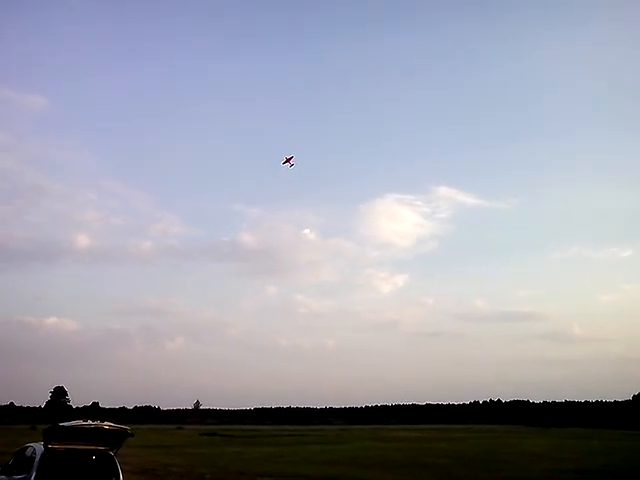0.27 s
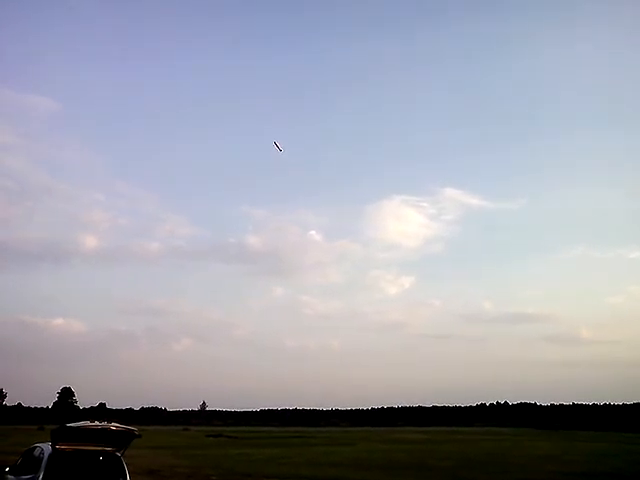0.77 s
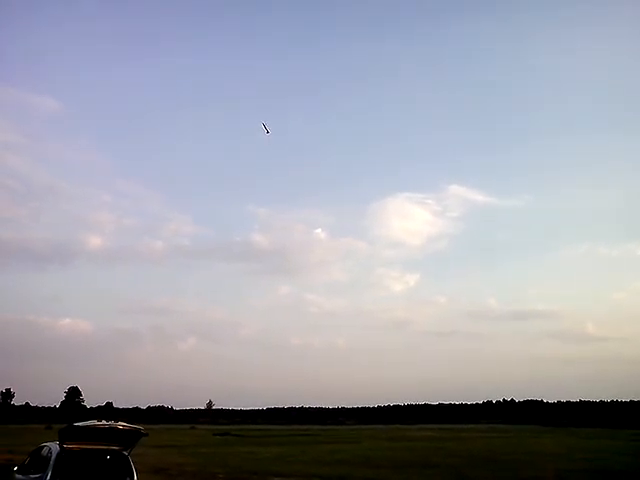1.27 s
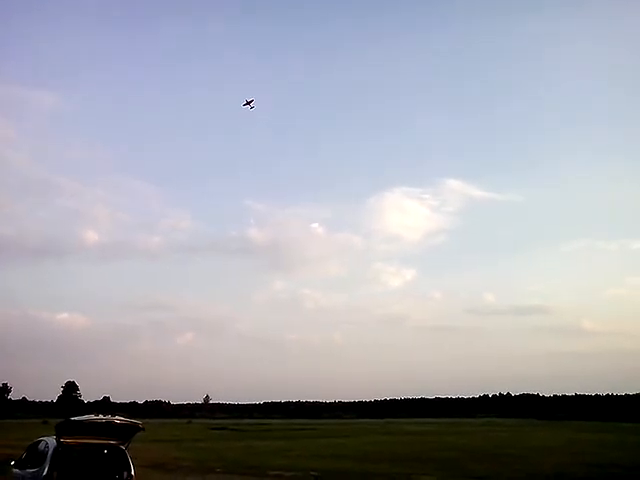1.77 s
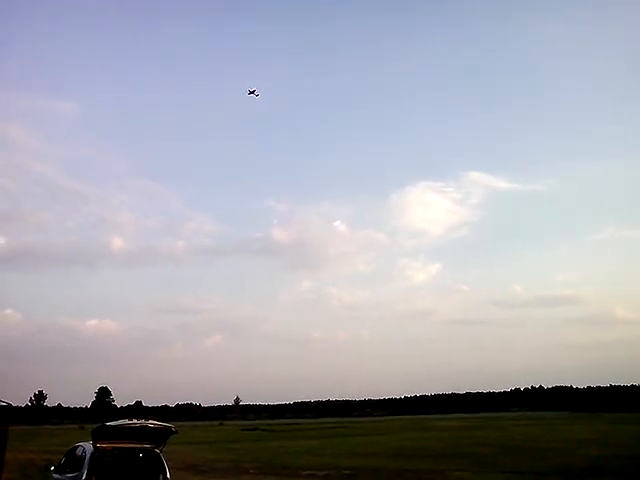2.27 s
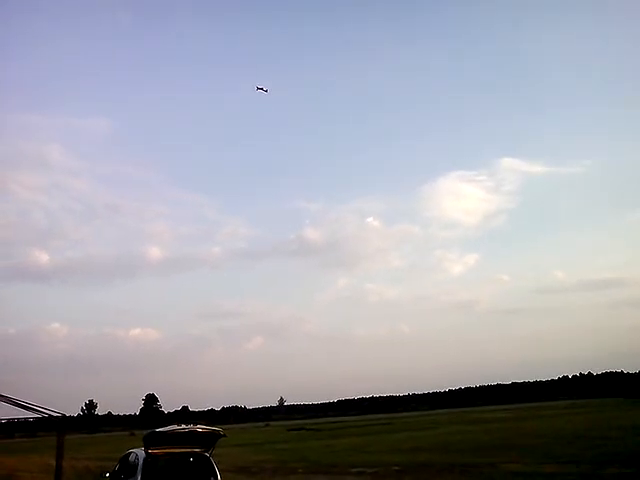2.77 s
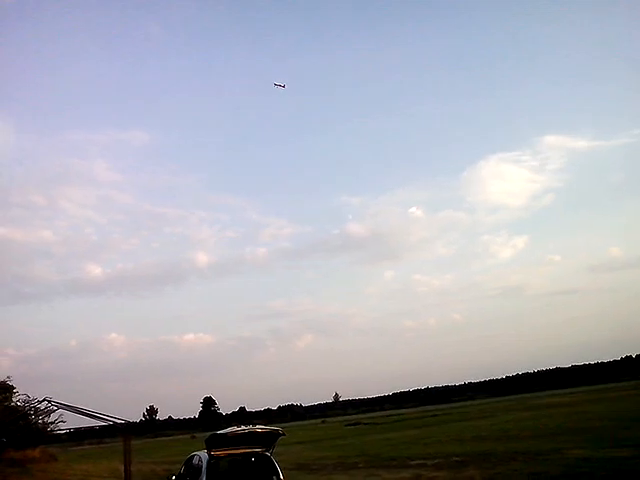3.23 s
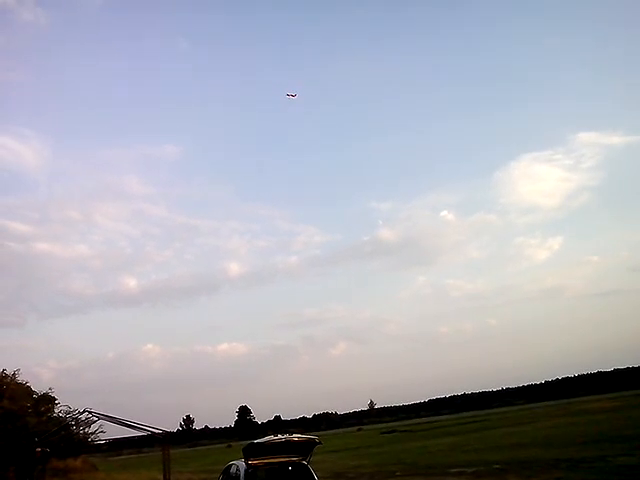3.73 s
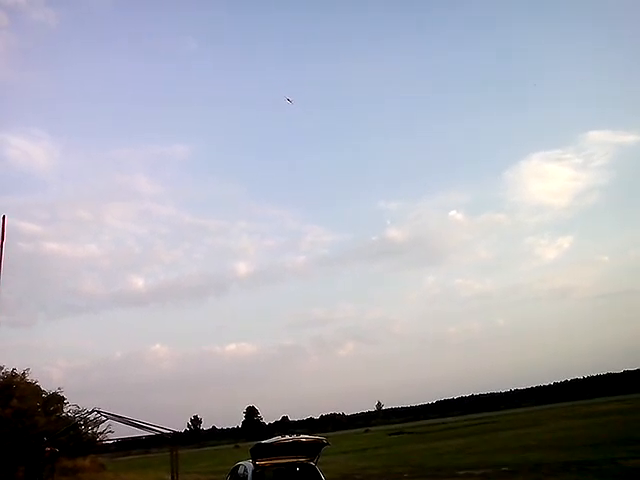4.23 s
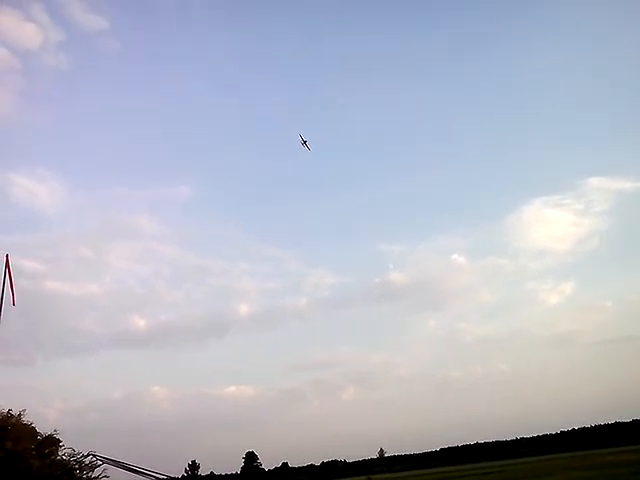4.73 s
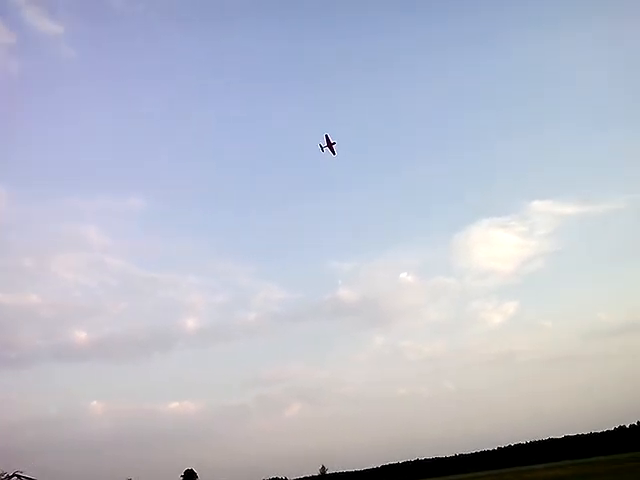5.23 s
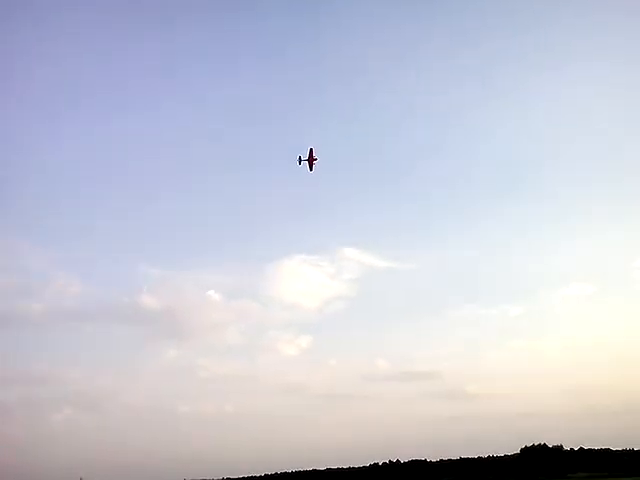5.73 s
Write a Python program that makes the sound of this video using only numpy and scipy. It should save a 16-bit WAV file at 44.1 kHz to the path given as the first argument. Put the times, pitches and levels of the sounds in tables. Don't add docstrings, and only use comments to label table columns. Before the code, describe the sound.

A small two-stroke petrol model aircraft flies over an open grass field, heard through a compact camera's narrow-band stereo microphone. From 0 s its raw, nasal buzz is already high, climbing to a peak near 0.5 s with gritty hiss and propeller swish. Around 0.7 s a short cluster of misfire pops breaks the tone; pitch sags and the sound recedes until 1.3 s, then swells again to about 1.75 s. From 1.8 s the throttle closes: the pitch falls fast through popping into a soft, low sputter. A brief blip rises at 2.6-2.9 s, then the engine sinks to its slowest, faintest putter around 3.6-3.9 s, with quiet air and a distant machine hum beneath. Uneven pops announce the throttle opening at 3.9-4.25 s; pitch races up by 4.7 s, and the hard, bright snarl keeps growing through the swoop, loudest towards 6 s, with slight reflections from ground and trees.

```python
import sys
import numpy as np
from scipy import signal
from scipy.fft import rfft, irfft, next_fast_len
from scipy.io import wavfile
from scipy.ndimage import uniform_filter1d, map_coordinates

SR = 44100
rng = np.random.default_rng(int(sys.argv[2]) if len(sys.argv) > 2 else 0)


def level_to_linear(level):
    exponent = np.asarray(level, float) / 20
    return 10 ** exponent


def output_pcm(signal):
    pcm = np.clip(np.atleast_2d(signal).T, -1, 1) * 32767
    wavfile.write(sys.argv[1], SR, np.round(pcm).astype(np.int16))


N = 264600

# time in seconds, exhaust level in dB,
# treble of the outlet in view in dB.
ENGINE = [(0, -34, -9.5), (.35, -35, -8.5), (.5, -29, -9.5), (.95, -32.5, -7), (1.3, -39, -11),
          (1.42, -35.5, -10.5), (1.8, -30.5, -8.5), (2, -33.5, -9.5), (2.3, -49, -20.5), (2.6, -44.5, -8),
          (2.8, -35.5, -9), (3.2, -45.5, -15.5), (3.65, -50.5, -27.5), (4.08, -39, -4.5),
          (4.25, -39, -14.5), (4.7, -29, -7), (5.1, -26.5, -5), (6, -24, -4.5)]


def shaft():
    # time in seconds, speed in turns per second.
    open_throttle = [
        (0, 102.5),
        (.3, 111.5),
        (.52, 113),
        (.8, 93),
        (1.22, 90.5),
        (1.45, 106),
        (1.65, 110),
        (4.82, 104),
        (5.35, 108),
        (6, 105),
    ]
    # time in seconds, speed in turns per second.
    coasting = [(1.82, 97.5), (2, 75), (2.18, 57.5), (2.31, 48.5), (2.5, 41), (2.6, 42), (2.73, 52),
                (2.83, 66), (2.88, 73.5), (3, 64), (3.2, 50), (3.4, 43), (3.54, 39.3), (3.86, 35.5),
                (3.99, 37), (4.17, 51.5), (4.44, 81.5), (4.6, 96)]
    inertia_s = .09
    speed = uniform_filter1d(curves(sorted(open_throttle + coasting))[0], size=int(inertia_s * SR))
    turns = np.cumsum(speed) / SR
    at = np.round(all_pops()[0] * SR).astype(int)
    slip = np.interp(np.arange(N), at, np.unwrap(turns[at] % 1, period=1))
    return speed, turns - uniform_filter1d(slip, size=3000)


def firing(speed):
    # speed in turns per second, crack level against the wash in dB, unevenness in dB.
    regularity = [
        (45, -3.5, 1.5),
        (70, -2.5, 1.2),
        (92, -1.4, .8),
        (107, -1.2, .8),
    ]
    # start in seconds, end in seconds.
    misfires = [
        (.65, .76),
        (1.81, 2.06),
        (2.52, 2.72),
        (3.83, 4.16),
    ]
    # time in seconds, extra unevenness in dB re 1 dB, width in seconds.
    shakes = [
        (.15, 3, .13),
        (.38, 0, .08),
        (1.42, 2, .1),
        (2.2, 0, .1),
        (3.3, 2, .06),
    ]
    choke_s, missed_crack_db, missed_uneven_db = .04, -12, 2.6
    t = np.arange(N) / SR
    rate, crack_db, uneven_db = np.transpose(regularity)
    missed = uniform_filter1d(sum(1. * (t > a) * (t < b) for a, b in misfires), size=int(choke_s * SR))
    crack_db = np.interp(speed, rate, crack_db) * (1 - missed) + missed_crack_db * missed
    uneven_db = np.interp(speed, rate, uneven_db) * (1 - missed) + missed_uneven_db * missed
    return crack_db, uneven_db + swells(shakes), missed


def all_pops():
    # time in seconds, peak in dB, treble in dB.
    lone = [(0.675, -25, -39), (0.694, -20, -37), (0.714, -17.5, -33), (0.735, -19.5, -34),
            (0.756, -26, -34), (0.777, -27, -36), (1.804, -25, -42), (1.836, -20, -39), (1.869, -22, -49),
            (1.904, -20, -49), (1.952, -22, -54), (2.032, -32, -56), (2.548, -30, -46), (2.595, -29, -48),
            (2.641, -28, -45), (2.663, -30, -52), (2.684, -27, -47), (2.704, -27, -45), (2.724, -28, -46),
            (3.593, -32, -58), (3.87, -30, -54), (3.897, -31, -58), (3.951, -29, -51), (3.977, -36, -54),
            (4.03, -33, -52), (4.078, -29, -42), (4.1, -29, -49), (4.121, -27, -54), (4.141, -30, -49),
            (4.161, -31, -49), (4.249, -25, -49)]
    # time in seconds, peak in dB, treble in dB.
    putts = [(2.619, -33, -48), (2.743, -39, -46), (2.761, -31, -50), (2.778, -28, -49), (2.794, -27, -55),
             (2.911, -29, -54), (3.219, -43, -59), (3.24, -34, -62), (3.26, -47, -59), (3.282, -35, -59),
             (3.369, -33, -55), (3.412, -38, -47), (3.436, -40.5, -54), (3.541, -48, -62), (3.62, -42, -62),
             (3.673, -42, -61), (3.728, -40, -54), (3.811, -38, -54), (3.842, -37, -48), (4.004, -38, -50),
             (4.055, -32, -44.5), (4.18, -30, -54), (4.198, -29, -53), (4.282, -31.5, -56),
             (4.355, -30, -50)]
    rows = np.vstack([lone, np.add(putts, [0, -2.5, -7])])
    return rows[np.argsort(rows[:, 0])].T


def crack_train(speed, turns):
    crack_db, uneven_db, _ = firing(speed)
    at = np.interp(np.arange(np.ceil(turns[0]), int(turns[-1]) + 1), turns, np.arange(N))
    i = at.astype(int)
    chance = rng.standard_normal((len(at), 2))
    size = level_to_linear(crack_db[i] + uneven_db[i] * chance[:, 0]) * np.sqrt(SR / speed[i])
    return -spikes(at + .55 * uneven_db[i] * chance[:, 1], size)


def puff(pulses, decay_s=.0029):
    return signal.lfilter([1], [1, -np.exp(-1 / (decay_s * SR))], np.abs(pulses))


def silencer_bark(level, cracks, pops, wash):
    # frequency in Hz, level in dB.
    silencer = [(120, -43), (250, -3), (340, -19), (430, 4.5), (560, 4), (750, -2.5), (980, -5.5),
                (1300, 3), (1700, 3.5), (1900, -17.5), (2300, -39.5)]
    # frequency in Hz, level in dB.
    pipe_end = [(1300, -22.5), (1700, -8), (1900, 1), (2300, -8.5), (2700, -6.5), (3300, -46.5)]
    # time in seconds, rasp in dB.
    facing = [(0, -11), (.5, -13), (.8, -7), (1.2, -15.5), (1.7, -15.5), (2, -15.5), (2.8, -17), (3.5, -45),
              (4.1, -8), (4.4, -9), (5, -7.5), (5.5, -5.5), (6, -9.5)]
    bark = level * (cracks + .012 * puff(cracks) * noise_pair() + .55 * wash * noise_pair())
    bark += pops + .007 * puff(pops) * noise_pair()
    return coloured(bark, silencer) + coloured(level_to_linear(curves(facing)[0]) * bark, pipe_end)


def outlet_sizzle(outlet, cracks, spits):
    # frequency in Hz, level in dB.
    hiss = [(1800, -66.5), (2600, -12), (3100, -1), (3600, 1.5), (4000, -4), (4300, -6.5), (4750, -8.5),
            (5500, -4.5), (6300, -11), (7000, -14.5), (8000, -43)]
    spit_s, spit_gain = .0007, .035
    cowl_ms, cowl_gain = 1.4, .33
    jet = .006 * puff(cracks) + spit_gain * puff(cracks, spit_s)
    sizzle = outlet * (.6 * cracks + jet * noise_pair())
    sizzle += spits + .03 * puff(spits) * noise_pair()
    answer = echoed(sizzle, cowl_ms * (1 + .03 * wobble(1.517)), cowl_gain)
    return coloured((sizzle + answer) / np.hypot(1, cowl_gain), hiss)


def pipe_resonances(charges, pops):
    # frequency in Hz, level in dB.
    thump = [(120, -30), (230, -8), (380, 0), (620, -2), (1000, -25)]
    # frequency in Hz, level in dB.
    howl = [(720, -30), (900, -4), (1000, 0), (1110, -4), (1350, -30)]
    # time in seconds, level in dB, width in seconds.
    end_on = [
        (.55, -30, 0.17),
        (4.65, -17.5, .15),
        (5.3, -20.5, .45),
    ]
    # time in seconds, level in dB, width in seconds.
    from_behind = [
        (1.5, -14, 0.11),
        (1.9, -14, .15),
        (2.75, -10, 0.1),
        (2.91, -12, .04),
        (3.45, -5, .12),
        (4.05, -2, .13),
        (5.9, -10, .2),
    ]
    # time in seconds, level in dB, width in seconds.
    can_open = [
        (.55, -5.5, 0.067),
        (.85, -4.5, .13),
        (1.08, -4.5, 0.073),
        (1.85, 1.5, 0.16),
        (5.9, -5.5, 0.2),
    ]
    tail_hz, tail_wide_hz = 1630, 170
    struck = charges + pops
    tail = rung(swells(from_behind) * struck, tail_hz, tail_wide_hz)
    ring = level_to_linear(29) * rung(tail, tail_hz, 2 * tail_wide_hz)
    ring -= level_to_linear(12) * rung(swells(can_open) * struck, 1290, 221)
    ring = ring + level_to_linear(-1.5) * coloured(pops[None], thump)
    return ring + coloured((swells(end_on) * charges)[None], howl)


def propeller_wash(strength):
    # frequency in Hz, level in dB.
    swish = [(1800, -52), (2500, -7.5), (3400, -1), (4300, -4.5), (5400, -3.5), (6300, -6.5), (7000, -13),
             (8000, -46.5)]
    # time in seconds, level in dB, width in seconds.
    buffets = [
        (1.85, -34, .1),
        (5.6, -27, .3),
    ]
    buffet = swells(buffets) * rung(rng.standard_normal(N), 163, 60)
    return coloured(.86 * strength * noise_pair(), swish) + buffet


def exhaust(speed, turns):
    # time in seconds, level in dB, width in seconds.
    flares = [
        (.45, -3.5, 0.031),
        (.8, -5.5, 0.073),
        (3.4, 11.5, 0.055),
        (4.75, -6.5, 0.16),
        (5.45, -4, 0.14),
        (5.79, -1.5, 0.056),
    ]
    # delay in milliseconds, gain.
    reflections = [
        (.62, -.15),
        (1.05, .2),
        (2.9, .25),
        (4.3, -.2),
    ]
    near_db, wash_falls, missed_wash_db, missed_treble_db = -35, .6, -4, -6
    level_db, treble_db = curves(ENGINE)
    crack_db, _, missed = firing(speed)
    cracks = crack_train(speed, turns)
    wash_db = 2.44 * wobble(30) + missed_wash_db * missed - wash_falls * np.clip(level_db - near_db, 0, None)
    wash = np.sqrt(1 - level_to_linear(2 * crack_db)) * level_to_linear(wash_db)
    outlet = level_to_linear(level_db + treble_db + missed_treble_db * missed) * (1 + swells(flares))
    s, pop_db, pop_treble_db = all_pops()
    at = (s + .0008) * SR
    pops = -spikes(at, level_to_linear(pop_db + 16))
    spits = -spikes(at, level_to_linear(pop_treble_db + 22.5))
    gas = silencer_bark(level_to_linear(level_db), cracks, pops, wash)
    gas += outlet_sizzle(outlet, cracks, spits)
    gas += propeller_wash(outlet * wash)
    gas += pipe_resonances(level_to_linear(level_db) * cracks, pops)
    gas = held_back(gas, 1100, 1700)
    bounced = sum(echoed(gas, ms * (1 + .082 * wobble(1.2)), gain) for ms, gain in reflections)
    return level_to_linear(-.5) * (gas + bounced)


def moving_colour(gas):
    # time in seconds, frequency in Hz, bandwidth in Hz,
    # change in dB, width in seconds.
    colour_moves = [(0.038, 770, 480, -7, .07), (.2, 980, 320, 2, 0.073), (0.24, 1200, 250, 4, 0.035),
                    (0.4, 600, 300, -7.5, 0.088), (0.36, 1300, 200, 5, 0.11), (.5, 780, 100, 3.5, 0.067),
                    (.45, 1800, 230, -5, 0.055), (0.41, 5000, 900, 6.5, 0.066), (0.576, 6100, 410, 10.5, .05),
                    (0.6, 6900, 600, -13.5, 0.088), (0.76, 8800, 500, 1.5, 0.046), (0.91, 1150, 270, 4, 0.22),
                    (1.15, 650, 420, -1.5, 0.059), (1.71, 1600, 580, 6.5, 0.41), (1.8, 820, 470, -11.5, 0.046),
                    (1.67, 4900, 640, 9, 0.069), (1.8, 3700, 1700, -5.5, 0.061), (4.14, 330, 400, 5, 0.15),
                    (5.35, 3000, 1000, -5.5, 0.35), (4.64, 5700, 1500, -7, .2), (4.3, 2900, 400, 11, 0.083),
                    (5.4, 1100, 220, 1, 0.23), (5.28, 3900, 280, 5, 0.14), (7.2, 7000, 360, -8, .08),
                    (5.56, 610, 160, 3, 0.21), (5.22, 1200, 320, -8, 0.17), (5.55, 4900, 700, 2, .2),
                    (5.1, 1600, 400, 3, 0.18), (5.75, 5100, 340, -13.5, 0.24), (5.98, 5400, 650, 5.5, 0.029),
                    (1.9, 4800, 6500, -5.5, .06), (2.5, 1000, 250, -13, 0.13), (2.9, 520, 230, 8, 0.14),
                  (2.75, 2530, 160, 11, 0.099), (2.3, 3500, 450, -4.5, .2), (3.35, 4400, 290, 8, 0.12),
                  (3.93, 920, 560, -8, 0.14), (4.15, 2160, 340, -11, 0.2), (4.7, 1000, 270, -2, 0.19),
                  (4.1, 6600, 2000, -5.5, .12), (7, 620, 300, -1, .1), (5.35, 517, 170, -6, 0.33),
                  (5.3, 860, 360, 5.5, 0.37), (.65, 1250, 330, 6.5, 0.046), (.1, 3000, 280, 3.5, .15),
                  (0.64, 1400, 230, -3.5, .08), (4.92, 1800, 320, -9, 0.23), (3.6, 2200, 800, -6.5, 0.14),
                  (0.2, 3550, 570, -9, 0.14), (1.2, 3100, 800, -4, 0.32), (6.2, 380, 120, -9, 0.79),
                  (0.15, 870, 88, 9, 0.061), (1.5, 850, 410, 2.5, 0.18), (5.85, 930, 250, 0.5, 0.19),
                  (4.3, 4300, 390, 1, 0.1), (5.3, 870, 120, 1, 0.17), (5.78, 1800, 200, 9.5, 0.097),
                  (1.4, 2700, 530, 4.5, 0.49), (2.08, 3600, 400, -9, 0.087), (2.3, 4300, 340, 7, .15),
                  (2.7, 3300, 280, 4, .1), (5.6, 4300, 240, 0.5, 0.18), (1.5, 400, 250, 3, 0.17),
                  (4.7, 1630, 350, 2, 0.073), (1.9, 3700, 300, 5, 0.061), (2.1, 1300, 330, -4.5, 0.1),
                  (5.3, 1090, 150, -2.5, 0.33), (5.14, 3000, 700, -2, .2), (.35, 1600, 300, -2, 0.19),
                  (4.93, 1000, 320, -1.5, .15), (1.45, 4000, 400, -4, .15)]
    out = gas.copy()
    for s, hz, wide_hz, db, width in colour_moves:
        first, last = int((s - 3 * width) * SR), int((s + 3 * width) * SR)
        near = slice(max(0, first), min(N, last))
        bell = np.exp(-.5 * ((np.arange(N)[near] / SR - s) / width) ** 2)
        out[:, near] += (level_to_linear(db * bell) - 1) * rung(gas[:, near], hz, wide_hz)
    return out


def drone(speed, turns):
    # time in seconds, delay in milliseconds.
    bounce = [
        (0, 5.2),
        (.6, 4.7),
        (1.25, 5.5),
        (1.6, 5.5),
        (2.2, 6.7),
        (4.4, 6.7),
        (5.65, 6.7),
        (5.9, 7.8),
        (6, 7.9),
    ]
    # frequency in Hz, level in dB.
    body = [(60, -45), (105, -18), (165, -8), (215, -12), (280, -4), (322, 0), (360, -15), (600, -70)]
    # frequency in Hz, level in dB.
    idle_body = [(60, -41), (105, -16), (140, -8.5), (180, -5.5), (230, -12.5), (290, -3.5), (335, -4),
                 (365, -16), (600, -72)]
    # time in seconds, drone change in dB, width in seconds.
    drone_moves = [
        (2.1, -0.5, .1),
        (2.45, 1, 0.16),
        (2.8, -5, 0.035),
        (3.05, 2, .1),
        (3.3, -6, .07),
        (3.6, 2, .15),
        (3.95, 1.5, .1),
        (4.25, -4, .1),
    ]
    # time in seconds, level in dB, width in seconds.
    throbs = [
        (.46, -39.5, 0.25),
        (1.58, -44.5, 0.23),
        (4.62, -50.5, 0.12),
        (5.7, -39, 0.31),
    ]
    # time in seconds, level in dB, width in seconds.
    blades = [
        (.07, -34.5, 0.099),
        (.27, -28.5, 0.059),
        (.37, -34.5, 0.031),
        (.46, -44, 0.046),
        (.56, -35, 0.031),
        (.645, -29.5, 0.05),
        (.79, -38, 0.092),
        (1.47, -30.5, 0.077),
        (1.62, -33.5, 0.082),
        (5.3, -42.5, .7),
    ]
    # time in seconds, level in dB, width in seconds.
    thirds = [
        (.3, -48, 0.099),
        (1, -48.5, 0.21),
        (2.08, -46, 0.052),
        (2.77, -45.5, 0.081),
        (3.45, -55, 0.033),
        (4.22, -46.5, 0.14),
        (4.85, -37, 0.17),
    ]
    bounce_gain, load_db, stumble, missed_drone_db = .85, .018, 1.1, -5
    path_s = curves(bounce)[0] / 1000
    slow = np.clip((85 - speed) / 12, 0, 1)
    level_db = curves(ENGINE)[0] + sum(db * swells([(s, 0, width)]) for s, db, width in drone_moves)
    level_db = level_db + 1.5 + load_db * np.gradient(speed) * SR
    beams = {1: swells(throbs), 2: swells(blades), 3: swells(thirds), 4: level_to_linear(-7) * swells(blades[:-1])}
    _, uneven_db, missed = firing(speed)
    total = np.zeros(N)
    for k in range(1, 11):
        comb = np.abs(1 + bounce_gain * np.exp(2j * np.pi * k * speed * path_s)) / 2
        colour_db = (1 - slow) * along(body, k * speed) + slow * along(idle_body, k * speed)
        waver = level_to_linear(stumble * uneven_db * wobble(21.93) + missed_drone_db * missed)
        gain = (level_to_linear(level_db + colour_db) * comb + beams.get(k, 0)) * waver
        total += gain * np.sqrt(2) * np.sin(2 * np.pi * (k * turns + rng.random()))
    return total


def ground_echo(gas):
    # time in seconds, delay in milliseconds, level in dB.
    grass = [
        (0, 4.4, -18),
        (1, 6.7, -15),
        (1.8, 4.77, -11),
        (2.5, 6.44, -10),
        (3.5, 6.44, -8),
        (4.5, 6.3, -11),
        (5.2, 6.65, -13),
        (6, 3.05, -17),
    ]
    delay_ms, ground_db = curves(grass)
    soft = signal.lfilter([.3], [1, -.7], gas)
    return echoed(soft, delay_ms, level_to_linear(ground_db))


def trees(x):
    # frequency in Hz, 60 dB decay time in seconds.
    decay = [(200, 0.33), (1500, .45), (6000, 0.05)]
    hz, t, z = signal.stft(rng.standard_normal(SR // 2), SR, nperseg=256)
    tail = signal.istft(z * level_to_linear(-60 * t / along(decay, hz)[:, None]), SR, nperseg=256)[1]
    late = np.pad(x, ((0, 0), (500, 0)))
    return signal.fftconvolve(late, tail[None] / np.linalg.norm(tail), axes=1)[:, :N]


def background():
    # frequency in Hz, level in dB per Hz.
    still_air = [(25, -49), (55, -21), (100, -18.5), (200, -12), (350, -17.5), (600, -17.5), (1500, -22),
                 (2500, -29), (6000, -36.5), (8000, -39.5)]
    hum = np.sin(2 * np.pi * np.cumsum(61.6 + 2 * wobble(10)) / SR)
    air = coloured(noise_pair(), still_air)
    return level_to_linear(-51.5 + 1.1 * wobble(28)) * hum + level_to_linear(-47 + wobble(2)) * air


def noise_pair():
    # frequency in Hz, share of noise power that differs between ports.
    apart_share = [(200, 0.023), (700, 0.22), (2000, 0.56), (4500, 1), (7000, 0.57)]
    z = rfft(rng.standard_normal((3, N)))
    apart = np.clip(along(apart_share, np.fft.rfftfreq(N, 1 / SR)), 0, 1)
    return irfft(np.sqrt(1 - apart) * z[0] + np.sqrt(apart) * z[1:], N)


def spikes(at, size):
    taps = np.floor(at)[:, None] + np.arange(-7, 9)
    offset = taps - at[:, None]
    kernel = np.sinc(offset) * np.cos(np.pi * offset / 16) ** 2
    index = np.clip(taps, 0, N - 1).astype(int)
    return np.bincount(index.ravel(), (kernel * size[:, None]).ravel(), N)


def echoed(x, delay_ms, gain):
    back = np.arange(N) - delay_ms * SR / 1000
    return gain * np.array([np.interp(back, np.arange(N), row, left=0) for row in x])


def rung(x, hz, wide_hz):
    return signal.lfilter(*signal.iirpeak(hz, hz / wide_hz, SR), x)


def held_back(x, hz, wide_hz):
    return x - 2 * rung(x, hz, wide_hz)


def response(spectrum, size=4096):
    cep = irfft(np.log(level_to_linear(along(spectrum, np.fft.rfftfreq(size, 1 / SR)))))
    cep[1:size // 2] *= 2
    cep[size // 2 + 1:] = 0
    return irfft(np.exp(rfft(cep)))[:size // 2]


def coloured(x, spectrum):
    h = response(spectrum)
    return signal.fftconvolve(x, h[None] / np.linalg.norm(h), axes=1)[:, :N]


def along(points, hz):
    f, v = np.transpose(points)
    return np.interp(np.log(hz + 1), np.log(f + 1), v)


def curves(rows):
    s, *cols = np.transpose(rows)
    return [np.interp(np.arange(N) / SR, s, c) for c in cols]


def swells(rows):
    t = np.arange(N) / SR
    return sum(level_to_linear(db) * np.exp(-.5 * ((t - s) / width) ** 2) for s, db, width in rows)


def wobble(rate):
    return map_coordinates(rng.standard_normal(int(N * rate / SR) + 4), [np.arange(N) * rate / SR])


def scene():
    speed, turns = shaft()
    gas = moving_colour(exhaust(speed, turns))
    plane = gas + ground_echo(gas) + drone(speed, turns)
    return plane + level_to_linear(-19) * trees(plane) + background()


def band_limit(x):
    hz, _, z = signal.stft(x, SR, nperseg=1024)
    loud_db = 10 * np.log10(uniform_filter1d(np.sum(np.abs(z[0]) ** 2, axis=0), size=9))
    chance = np.repeat(rng.random(60), 9)[:len(loud_db)]
    loud_top_hz = np.where(chance < .55, 7450, 7000)
    top_hz = np.where(loud_db < -45.3, 8100, loud_top_hz)
    return signal.istft(z * (hz[:, None] < top_hz), SR, nperseg=1024)[1][:, :N]


def top_cut(x):
    return signal.sosfilt(signal.butter(12, 8140, fs=SR, output="sos"), x)


def record(dry):
    # frequency in Hz, level in dB.
    left_port = [(380, 0), (520, 1.5), (720, -6.5), (950, 4), (1200, -10), (1450, -6), (1680, -9),
                 (1900, 1), (2300, 0)]
    # frequency in Hz, level in dB.
    right_port = [(380, 0), (520, 0), (750, -2), (870, -10), (1060, 3), (1300, 1.5), (1430, -10), (1600, 0),
                  (1950, -3.5), (2800, -4), (3650, -3), (4900, -7), (6950, -10), (7100, -24)]
    # frequency in Hz, phase in radians.
    phase = [(20, 0), (300, .2), (600, .7), (800, .2), (1000, 1.55), (1150, 1.5), (1350, -1.5), (1480, 1.3),
             (1700, -.6), (2050, -.3), (3100, -3.5), (4200, -3.2), (5500, -7.3), (6400, -8.5)]
    # delay in milliseconds, gain.
    round_body = [
        (0, .6),
        (1.55, -.65),
        (3.05, .55),
    ]
    lag_s, round_above_hz = .00125, 3600
    m = next_fast_len(N + 8192)
    hz = np.fft.rfftfreq(m, 1 / SR)
    left = rfft(response(left_port), m)
    right = left * level_to_linear(along(right_port, hz) - along(left_port, hz))
    right = right * np.exp(1j * (along(phase, hz) - 2 * np.pi * hz * lag_s))
    scattered = sum(gain * np.exp(-2j * np.pi * hz * ms / 1000) for ms, gain in round_body)
    right *= 1 + (scattered - 1) / (1 + (round_above_hz / (hz + 1)) ** 10)
    ports = irfft(rfft(dry, m) * [left, right], m)[:, :N]
    return top_cut(band_limit(ports))


dry = scene()
out = record(dry)
output_pcm(out)
```